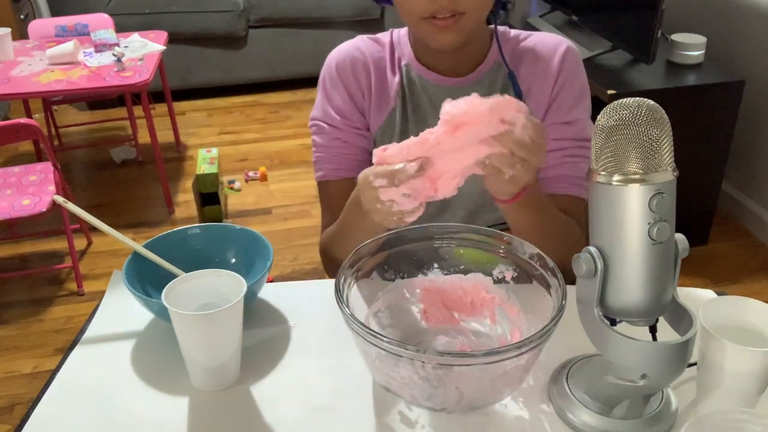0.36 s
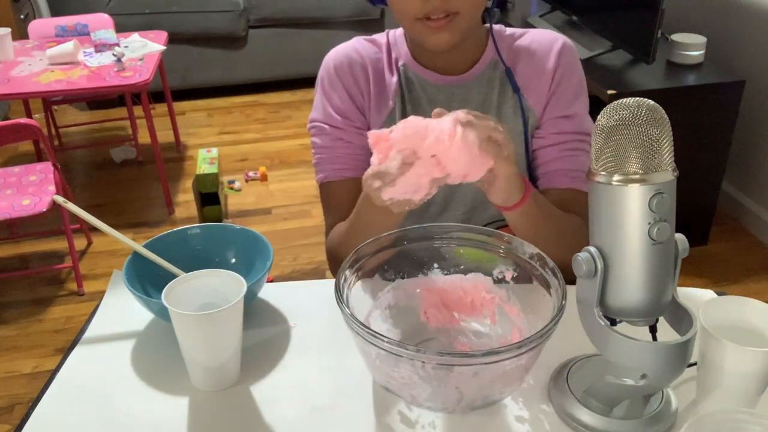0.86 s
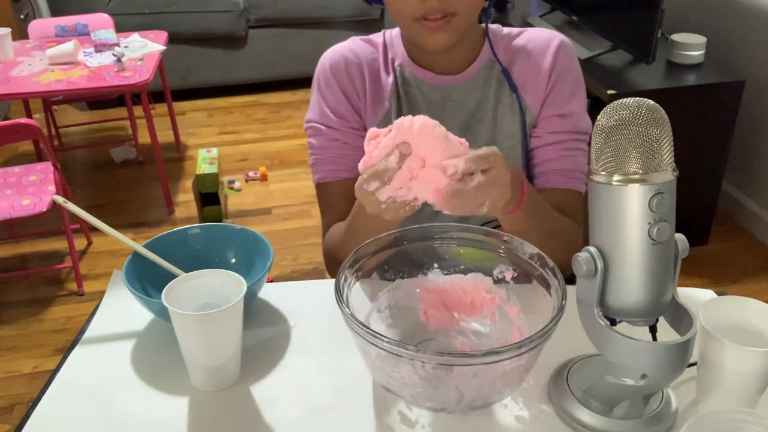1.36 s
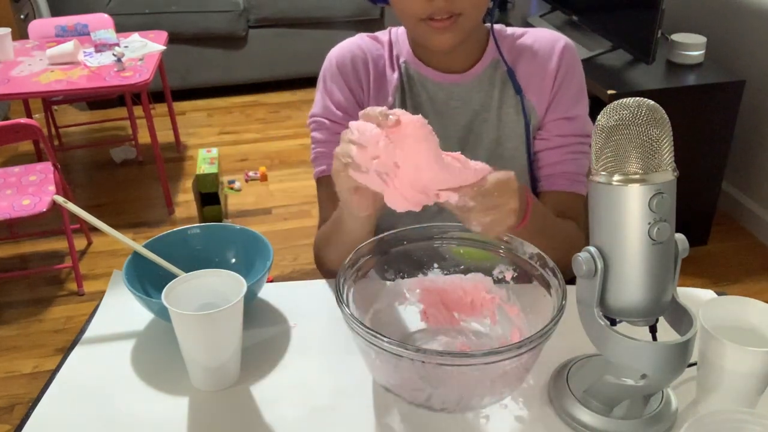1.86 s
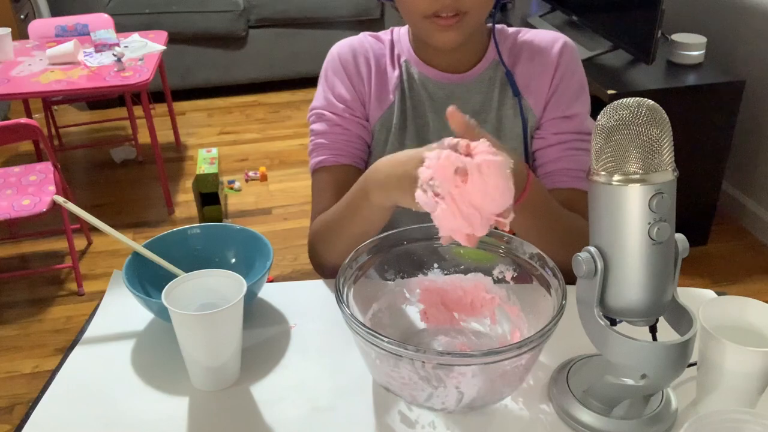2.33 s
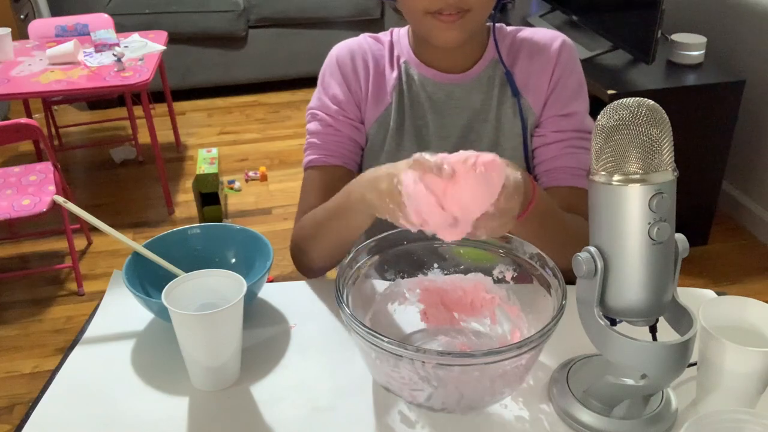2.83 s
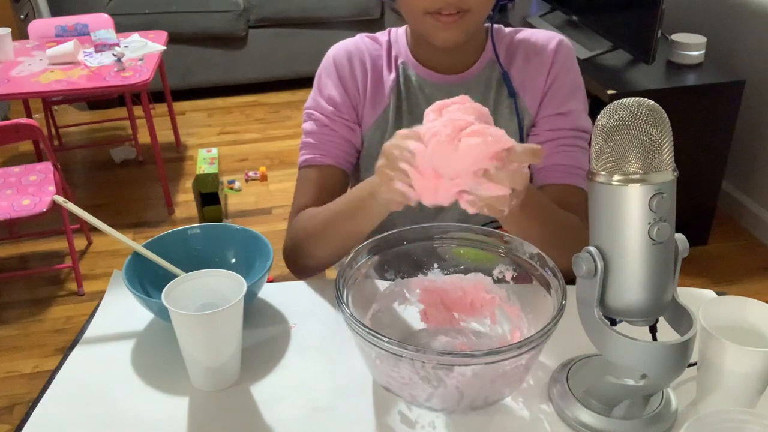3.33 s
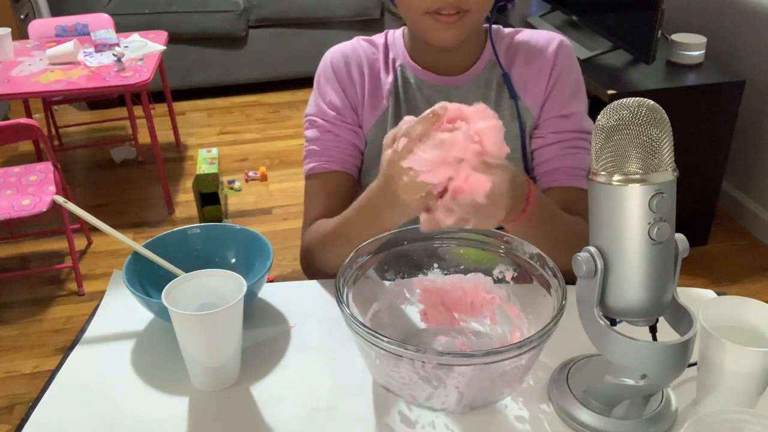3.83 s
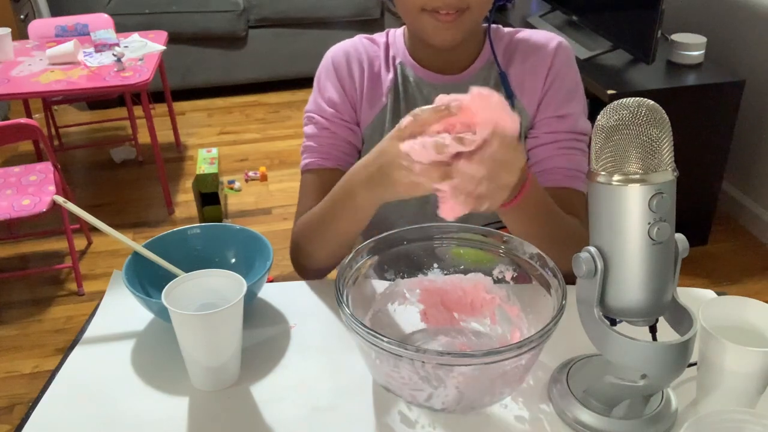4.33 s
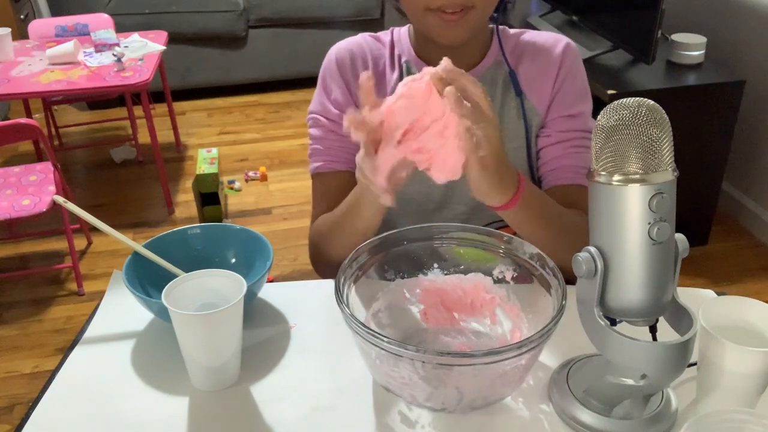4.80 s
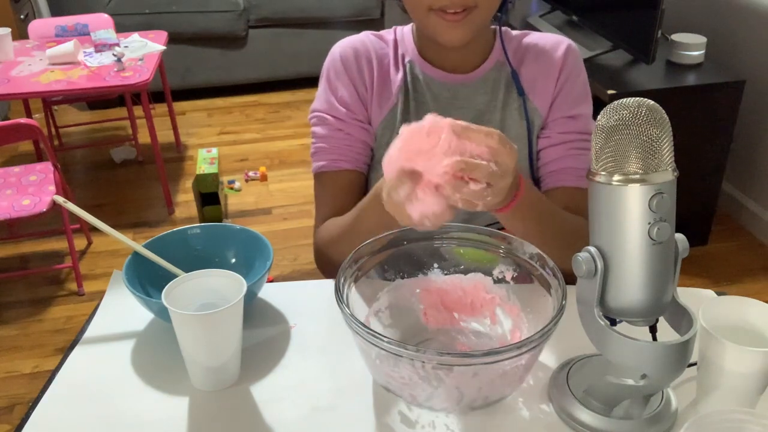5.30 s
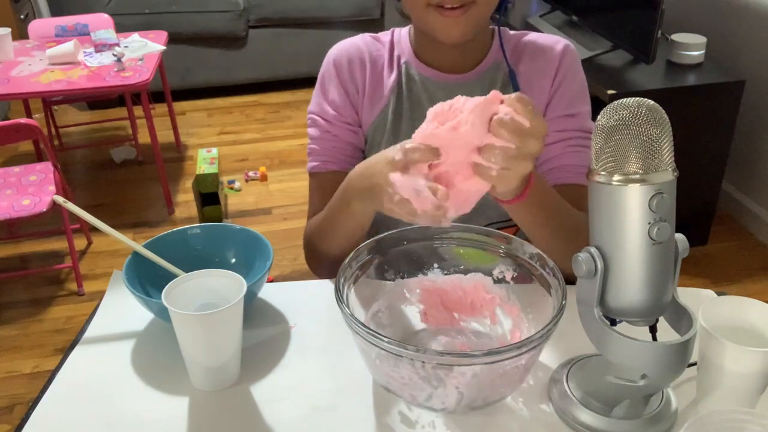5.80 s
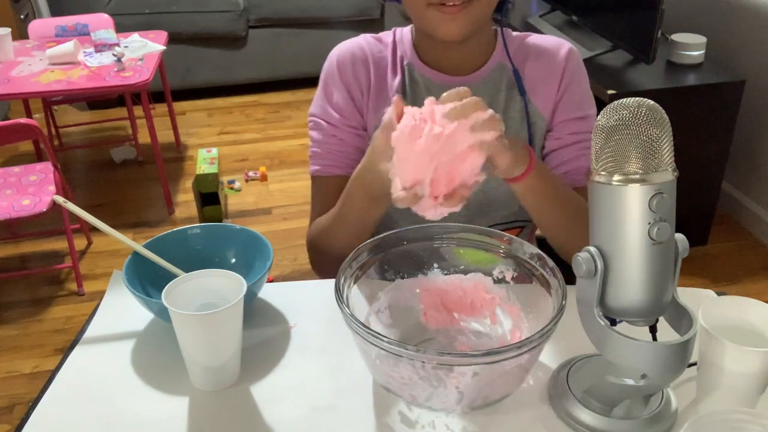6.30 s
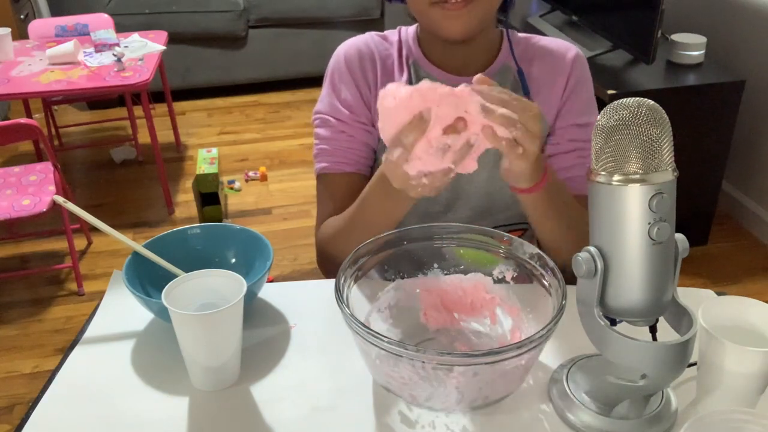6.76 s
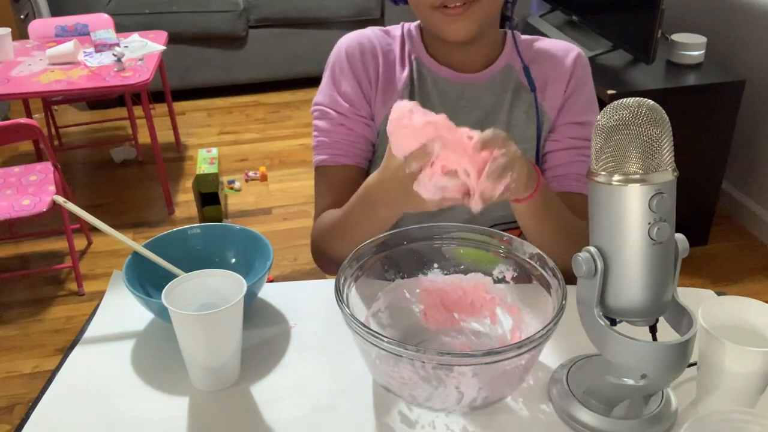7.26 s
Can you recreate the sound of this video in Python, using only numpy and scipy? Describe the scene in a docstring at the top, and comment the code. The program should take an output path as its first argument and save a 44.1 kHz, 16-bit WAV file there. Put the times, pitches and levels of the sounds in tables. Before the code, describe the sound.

Hands squeeze and stretch foamy slime close to a microphone, dense wet crackling with sharp pops and snaps, faint low table thumps, quiet room.

```python
"""Quiet room: hands knead foamy slime above a glass bowl, just right of a stereo microphone.
The loudest pops, low or high, come one by one: film snap, pocket ring, low puff.
Fainter pockets crackle as short rings in random clumps, denser as the squeeze grows.
Noise bounces and a decaying tap tail return each burst from hands, table, bowl and room.
Elbows now and then jolt the table: decaying low sines over steady air noise."""
import sys
import numpy as np
from scipy import signal
from scipy.fft import rfft, irfft
from scipy.io import wavfile
from scipy.ndimage import uniform_filter1d

SR = 44100
rng = np.random.default_rng(int(sys.argv[2]) if len(sys.argv) > 2 else 0)


def invert_db(x):
    """Field ratio 10**(x/20) for x, a level in decibels (scalar or array-like)."""
    u = np.asarray(x, float) / 20
    return 10 ** u


def wav_out(sig):
    """Save sig, one row per channel (or a flat mono array), as 16-bit PCM at SR to the path in sys.argv[1]."""
    wavfile.write(sys.argv[1], SR, np.round(np.clip(np.atleast_2d(sig).T, -1, 1) * 32767).astype(np.int16))


N = 336924

# Loudest pops, rms over 3 ms before panning and filters: start_s, snap_db, pocket_hz, ring_db, puff_db
POPS = [(0.0028, -52, 2530, -37.5, -34), (0.1336, -34, 1500, -31, -38), (0.1487, -42, 2230, -39, -42),
        (0.1835, -41, 6000, -42, -44), (0.2537, -40.5, 11600, -46, -55), (0.4795, -32, 9100, -41, -49),
        (0.484, -60, 905, -38.5, -57), (0.4968, -33, 12900, -37, -41), (0.5368, -34.5, 8950, -37, -66),
        (0.554, -36, 7500, -45, -50), (0.6228, -47, 5400, -42, -50), (0.7137, -34.5, 5170, -43.5, -73),
        (0.912, -47, 2500, -48.5, -45.5), (0.9572, -48, 5200, -43.5, -52), (1.023, -37, 9200, -34.5, -56),
        (1.068, -57, 1500, -48, -41), (1.1267, -37.5, 5130, -33, -40.5), (1.444, -38, 8700, -37.5, -66),
        (1.6314, -42, 3070, -41, -41), (1.6965, -38, 7900, -40.5, -43), (1.8213, -40.5, 7200, -38.5, -42),
        (1.8837, -36, 6750, -29, -35.5), (2.1167, -41, 3560, -27, -60), (2.118, -50, 1510, -30.5, -44),
        (2.119, -33, 6900, -23, -62), (2.1592, -55, 5300, -39, -60), (2.211, -45, 2400, -47, -50),
        (2.2691, -56, 4480, -38.5, -52), (2.2952, -48, 2420, -39, -41.5), (2.555, -61, 1100, -39.5, -41),
        (2.709, -61, 6300, -29.5, -43), (2.7742, -34.5, 960, -35, -35), (2.809, -27.5, 3020, -27, -27.5),
        (2.8815, -46, 2120, -35, -44), (2.9096, -43, 3100, -35, -62), (2.9301, -64, 6600, -37, -59),
        (2.991, -73, 3860, -31, -54), (3.0711, -45, 4130, -35, -49), (3.0835, -49, 6200, -36, -50),
        (3.1944, -41.5, 5230, -40.5, -60), (3.2314, -37, 2600, -39, -40), (3.2454, -43, 2480, -41, -39.5),
        (3.2731, -26, 6300, -25, -30), (3.362, -38, 7900, -38, -40), (3.3855, -35.5, 5400, -53, -44),
        (3.4365, -37, 7950, -36, -52), (3.4794, -37, 3280, -31, -37), (3.541, -48, 5400, -41.5, -55),
        (3.6904, -35.5, 6760, -34, -52), (3.886, -52, 1110, -40, -47), (4.101, -43.5, 1730, -43.5, -49),
        (4.2498, -47, 3400, -39.5, -44.5), (4.418, -28.5, 7600, -27, -36), (4.4204, -55, 3360, -31, -40),
        (4.4855, -33, 3800, -39, -42), (4.4995, -56, 6600, -41, -51), (4.6085, -42, 5000, -45, -59),
        (4.618, -30, 6350, -32, -52), (4.658, -37, 3150, -37, -61), (4.7601, -38.5, 3300, -38.5, -44),
        (4.7902, -32, 13500, -26.5, -45), (4.9098, -54, 1070, -48, -34.5), (4.9179, -46, 3150, -36, -33),
        (5.0204, -34.5, 2200, -41, -67), (5.052, -62, 4800, -37, -41.5), (5.0778, -46, 4530, -38.5, -50),
        (5.2187, -66, 1500, -30.5, -54), (5.2694, -38.5, 5860, -39, -70), (5.29, -35.5, 2400, -37.5, -60),
        (5.4374, -36, 6260, -44, -51), (5.497, -38, 1250, -37.5, -44), (5.5104, -48, 3000, -42, -42),
        (5.629, -48, 5500, -42, -52), (5.6426, -48, 6760, -37, -50), (5.6883, -44, 7060, -33, -36),
        (5.772, -33, 6200, -29, -38), (5.8426, -40, 1620, -36, -51), (5.9177, -30, 3050, -32, -45),
        (5.9208, -30.5, 12600, -29.5, -36), (5.9259, -34, 2350, -30.5, -48),
        (6.0594, -37.5, 4860, -44, -43.5), (6.1887, -42, 7350, -35, -41), (6.3609, -39.5, 6500, -42, -44),
        (6.517, -47, 3020, -50, -52), (6.636, -34.5, 1290, -31.5, -44), (6.653, -43, 5100, -29.5, -41),
        (6.68, -36.5, 5530, -38.5, -41), (6.737, -38.5, 6800, -37.5, -47), (6.8108, -36, 3500, -36.5, -65),
        (6.8304, -38.5, 1130, -37, -47), (6.9053, -32, 1190, -29, -29.5), (6.9337, -29, 7500, -25.5, -64),
        (6.9848, -43, 6050, -44, -52), (7.0272, -40, 8000, -57, -46), (7.183, -42, 5000, -49, -43),
        (7.2176, -35.5, 1300, -40, -46), (7.377, -37, 2160, -39.5, -47), (7.4903, -71, 2030, -44, -35),
        (7.5077, -70, 1350, -31, -35), (7.5229, -58, 2000, -35, -60), (7.53, -45, 2570, -26.5, -34.5)]
# Where the hands work: time_s, left_minus_right_db
HAND_PLACE = [(0, -7), (2.5, -9), (5, -8.5), (6, -4.5), (7.6, -7.5)]
# Crackle colour, relative: freq_hz, level_db_per_hz
FOAM_COLOUR = [(150, -38), (250, -9), (416, 0.5), (644, -7), (1110, -1), (2360, -7), (7760, -8),
               (10200, -15), (14000, -7.5), (15700, -33)]
# Presses: grip_peak_s, crackle_db (before layer and colour gains), swell_s_per_10db, ebb_s_per_10db,
# tilt_db_per_2_octaves
SQUEEZES = [(0.19, -56.5, 0.9, .16, -1), (0.48, -46, 0.03, .06, 6), (0.545, -47, .01, .04, 6),
            (0.67, -59, 0.3, 0.1, 5.5), (0.93, -58, 0.06, 0.07, 2), (1.05, -55.5, 0.13, 0.19, -1),
            (1.4, -63, 0.5, 0.45, -1), (1.71, -58.5, 0.16, 0.43, -1.5), (2.03, -55.5, 0.33, 0.08, 3.5),
            (2.15, -55, .05, 0.13, 7), (2.28, -48, 0.13, 0.09, 2), (2.42, -56.5, 0.15, .025, 2),
            (2.65, -60, .07, .6, 3), (3.07, -50.5, 0.1, 0.12, 1.5), (3.49, -48.5, 0.27, 0.23, 3),
            (4.22, -58, 0.77, 0.4, -2.5), (4.43, -51, 0.11, 0.1, -2), (4.626, -49.5, 0.03, 0.17, 4),
            (5.03, -54.5, 0.3, 0.06, 4), (5.3, -55, .3, 0.3, 2.5), (5.62, -51, 0.03, 0.18, 5),
            (5.74, -45.5, .12, .12, 4), (5.94, -53, 0.08, 0.24, 1.5), (6.36, -56, .5, 0.22, 3),
            (6.67, -57, 0.15, 0.2, 6.5), (6.9, -55, 0.14, 0.24, 0), (7.15, -54.5, 0.03, 0.32, 3),
            (7.53, -51, 0.12, .13, -2)]
# Near bounces, energy relative to the burst: left_db, right_db
NEAR_DB = [-16, -7.5]
# Room decay: freq_hz, t60_s
ROOM_DECAY = [(300, 0.2), (2000, 0.26), (12000, 0.13)]
# Room tone colour, relative: freq_hz, level_db_per_hz
AIR_COLOUR = [(12, -39), (28, -3), (40, 2.5), (170, -8), (416, -10), (1110, -17), (4000, -36), (16500, -60)]
# Jolts through the table, level before side gains: start_s, level_db, swing_hz, t60_s
JOLTS = [(.49, -47, 40.2, .15), (1.855, -42, 46, 0.14), (1.91, -46.5, 25.4, 0.69), (6.62, -48, 30.2, 0.3)]
# Left capsule's thinner view of the slime: freq_hz, gain_db
LEFT_SHADE = [(300, -2.5), (2000, -0.5), (10000, 2)]
# Left capsule delay range: min_s, max_s
LEFT_LAG_S = (-2.5e-5, 5.5e-5)

REST_DB, REST_TILT_DB_PER_2_OCT = -72, -8  # foam keeps settling between presses
NEAR_T60_S, ROOM_DB, AIR_DB = 0.015, -20, -62.5
BOWL_HZ, BOWL_T60_S, BOWL_DB = 415, 0.035, 3


def unit(x):
    """Scales to energy 1."""
    return x / np.sqrt(np.sum(x ** 2) + 1e-20)


def read(points, hz):
    """Reads a table on a log-frequency axis."""
    f, value = np.transpose(points)
    return np.interp(np.log(hz + 1), np.log(f + 1), value)


def sides(pan_db):
    """Left and right gains of constant total power."""
    left = invert_db(pan_db)
    return np.array([left, np.ones_like(left)]) / np.sqrt(1 + left ** 2)


def lag_samples(u):
    """Left capsule delay for a draw u in 0-1."""
    return round(np.interp(u, (0, 1), LEFT_LAG_S) * SR)


def add(mix, start_s, sound):
    """Mixes a stereo sound in at start_s."""
    part = mix[:, round(start_s * SR):][:, :sound.shape[1]]
    part += sound[:, :part.shape[1]]


def ring(hz, cycles, phase_turns, end_ratio=0.94, size=900):
    """Air pocket: a few decaying cycles, pitch sliding from hz to end_ratio * hz."""
    turns = np.arange(size) * hz / SR
    decay = np.exp(-turns / cycles)
    bend = end_ratio * turns - (end_ratio - 1) * cycles * (1 - decay)
    onset = (1 - np.exp(-6 * turns)) ** 2
    return unit(np.sin(2 * np.pi * (bend + phase_turns)) * decay * onset)


def room_tone():
    """Steady coloured air noise, mostly unrelated left and right."""
    hz = np.fft.rfftfreq(N, 1 / SR)
    shared, own = rng.standard_normal(N), rng.standard_normal((2, N))
    air = irfft(rfft(own + 0.48 * shared) * invert_db(read(AIR_COLOUR, hz)), N)
    return invert_db(AIR_DB) * air / air.std() * invert_db([[1], [-1]])


def grip():
    """Presses swell and ebb at steady dB rates and add in power, which also weights the tilt."""
    t = np.arange(0, N + 64, 64) / SR
    peak_s, db, swell_s, ebb_s, tilt_db = np.transpose(SQUEEZES)[:, :, None]
    power = invert_db(db - 10 * np.maximum((peak_s - t) / swell_s, (t - peak_s) / ebb_s)) ** 2
    rest = invert_db(REST_DB) ** 2
    total = power.sum(0) + rest
    tilt = ((power * tilt_db).sum(0) + rest * REST_TILT_DB_PER_2_OCT) / total
    return [np.interp(np.arange(N) / SR, t, curve) for curve in (10 * np.log10(total), tilt)]


def crackle(db, per_s, denser, spread_db, clump_db, clump_s, cycles, bright_db_per_oct=0,
            span_hz=(350, 15000), count=30):
    """Fainter pockets burst at random, in clumps; a harder squeeze bursts more a second."""
    level_db, tilt_db = grip()
    clumps = uniform_filter1d(rng.standard_normal(N), round(clump_s * SR))
    clumps = invert_db(clump_db * clumps / clumps.std())
    more = invert_db(denser * (level_db + 56.5))
    burst = rng.random(N) < per_s / SR * more * clumps / clumps.mean()
    strength = invert_db(spread_db * np.minimum(rng.exponential(1, N), 4)) * rng.choice([-1, 1], N)
    # burst count must not change the mean power
    strength *= burst / np.sqrt(np.mean(strength ** 2) * per_s / SR * more)
    pan_db = np.interp(np.arange(N) / SR, *np.transpose(HAND_PLACE))
    place = sides(pan_db + 5 * rng.standard_normal(N))
    # pitch band drifts, so bursts close in time tend to ring alike
    drift = np.cumsum(rng.standard_normal(N)) * 0.02
    band = ((drift + 0.6 * rng.random(N)) % 1 * count).astype(int)
    out = np.zeros((2, N))
    for k, hz in enumerate(np.geomspace(*span_hz, count)):
        octaves = np.log2(hz / 3000)
        colour_db = read(FOAM_COLOUR, hz) - read(FOAM_COLOUR, 4600)
        slope_db = 2.94 + tilt_db / 2 + bright_db_per_oct
        loud = invert_db(level_db + db + colour_db + slope_db * octaves)
        grain = ring(hz, cycles * (0.5 + rng.random()), rng.random(), size=500)
        pair = np.array([np.roll(grain, lag_samples(rng.random())), grain])
        out += signal.oaconvolve(place * strength * loud * (band == k), pair, axes=1)[:, :N]
    return out


def pops():
    """Stretched film tears, then snaps; the pocket rings, longer behind a soft snap; air puffs low."""
    lead = 200  # samples of tearing ahead of the snap
    out, t = np.zeros((2, N + lead)), np.arange(900) / SR
    for (start_s, snap_db, hz, ring_db, puff_db), u in zip(POPS, rng.random((len(POPS), 1107))):
        tears = (u[7 + lead:] - 0.5) ** 3 * np.exp(-t / (0.00017 + 0.0011 * u[4] ** 2))
        tears[0] = 0.041 * np.sign(u[0] - 0.5)
        top_hz = np.clip(8500 + 0.8 * hz, 6000, 18000)  # film over a higher pocket snaps brighter
        snap = unit(signal.lfilter(*signal.butter(1, [4000, top_hz], "band", fs=SR), tears))

        cycles = 1.0 + 0.018 * np.clip(ring_db - snap_db, 0, 30)
        short_ring = ring(min(hz, 2600) * (1.06 + 0.53 * u[2]), 0.25, u[1])
        pocket = unit(ring(hz, cycles, u[1]) + 0.4 * short_ring)
        puff = unit(ring(459, 1.04, u[1]) + 0.81 * ring(800 + 350 * u[4], 0.77, u[3]))
        pop = invert_db(snap_db) * snap + invert_db(ring_db) * pocket + invert_db(puff_db) * puff

        # sparse fainter copies build up to the pop
        before = (2 * u[7:7 + lead] - 1) ** 21 * np.exp(-t[lead - 1::-1] / 0.0011)
        pop = signal.oaconvolve(np.append(0.24 * before, 1), pop)
        pair = np.array([np.roll(pop, lag_samples(u[5])), pop])
        pan_db = np.interp(start_s, *np.transpose(HAND_PLACE)) + 6 * (u[6] - 0.5)
        # unit energy to unit rms over 3 ms
        add(out, start_s, np.sqrt(0.003 * SR) * sides(pan_db)[:, None] * pair)
    return out[:, lead:]


def near():
    """Dense decaying bounces off hands, bowl and table, from 1.1 ms on."""
    t = np.arange(1500) / SR
    bounces = rng.standard_normal((2, len(t))) * invert_db(-60 * t / NEAR_T60_S) * (t > 0.0011)
    return invert_db(NEAR_DB)[:, None] * bounces / np.linalg.norm(bounces, axis=1)[:, None]


def room():
    """Sparse taps of random sign, each band dying at its own speed."""
    taps = np.zeros((2, SR // 2))
    at = np.arange(260, SR // 2 - 20, 20)
    at = at + rng.integers(0, 20, (2, len(at)))
    np.put_along_axis(taps, at, rng.choice([-1., 1.], at.shape), 1)
    hz, t, z = signal.stft(taps, SR, nperseg=256)
    decay = invert_db(-60 * t / read(ROOM_DECAY, hz)[:, None])
    tail = signal.istft(z * decay, SR, nperseg=256)[1]
    return invert_db(ROOM_DB) * tail / np.linalg.norm(tail[0])


def bowl(hz):
    """Bowl air resonance: response that lifts a narrow band of all indirect sound."""
    damping = BOWL_T60_S * 2 * np.pi / np.log(1000)
    return 1 + invert_db(BOWL_DB) / (1 + 1j * (hz - BOWL_HZ) * damping)


def jolts():
    """Table and stand swing slowly after an elbow's nudge: decaying sines, stronger on the right."""
    out, t = np.zeros((2, N)), np.arange(SR // 2) / SR
    for start_s, db, hz, t60_s in JOLTS:
        swing = np.sin(2 * np.pi * hz * t) * invert_db(db - 60 * t / t60_s) * (1 - np.exp(-t / 0.011))
        add(out, start_s, -np.array([[0.2], [1.7]]) * swing)
    return out


def scene():
    """Bursts and near bounces lean right, the room tail is even; bounces keep changing pattern."""
    fizz = crackle(db=-0.5, per_s=3700, denser=0.8, spread_db=2, clump_db=6, clump_s=0.0091, cycles=0.46)
    ticks = crackle(db=2.5, per_s=280, denser=0.37, spread_db=3, clump_db=6.5, clump_s=0.0033,
                    cycles=0.65)
    # finest foam
    hiss = crackle(db=-8.5, per_s=7000, denser=0.6, spread_db=1, clump_db=3.5, clump_s=0.022,
                   cycles=0.62, bright_db_per_oct=1.5, span_hz=(1500, 15500), count=12)
    # wet folds
    gurgle = crackle(db=-3.0, per_s=220, denser=0.8, spread_db=2.5, clump_db=7, clump_s=0.015,
                     cycles=1.2, span_hz=(430, 1600), count=12)
    hz, t = np.fft.rfftfreq(N, 1 / SR), np.arange(N) / SR
    no_bass = hz ** 4 / (hz ** 4 + 320 ** 4)  # small sources radiate no bass
    slime = irfft(rfft(pops() + fizz + ticks + hiss + gurgle) * no_bass, N)
    slime[0] = irfft(rfft(slime[0]) * invert_db(read(LEFT_SHADE, hz)), N)
    whole, around = slime.sum(0)[None] / np.sqrt(2), room_tone()
    for k in range(10):  # ten random echo patterns, crossfaded 50 ms apart, cycling every 0.5 s
        share = np.cos(np.pi / 2 * np.clip((20 * t + k) % 10 - 5, -1, 1))
        back = room()
        back[:, :1500] += near()
        around += signal.oaconvolve(whole * share, back, axes=1)[:, :N]
    return slime + irfft(rfft(around) * bowl(hz), N) + jolts()


def low_pass(x):
    """Removes everything above the highest recorded frequency."""
    return signal.sosfilt(signal.butter(12, 16980, fs=SR, output="sos"), x)


def record(dry):
    """Linear-phase low-pass at 16050 Hz on the finished mix."""
    edge = signal.firwin(255, 16050, window=("kaiser", 9), fs=SR)
    mix = signal.oaconvolve(dry, edge[None], "same", axes=1)
    return low_pass(mix)


dry = scene()
out = record(dry)
wav_out(out)
```